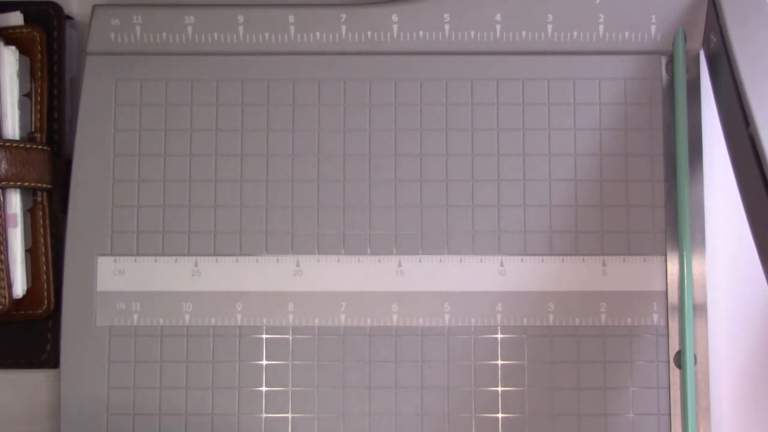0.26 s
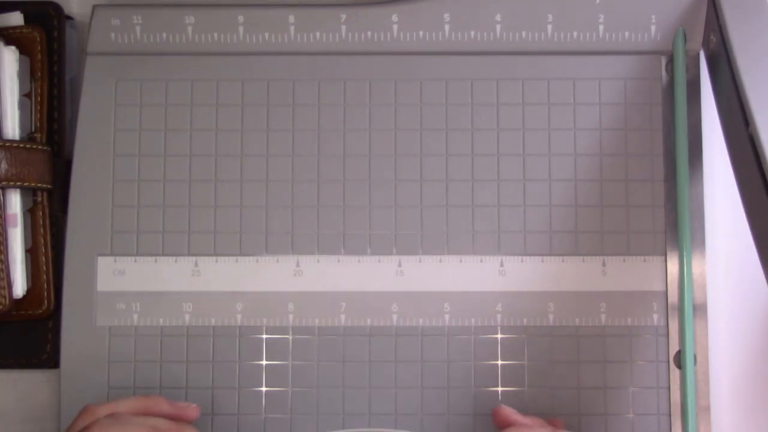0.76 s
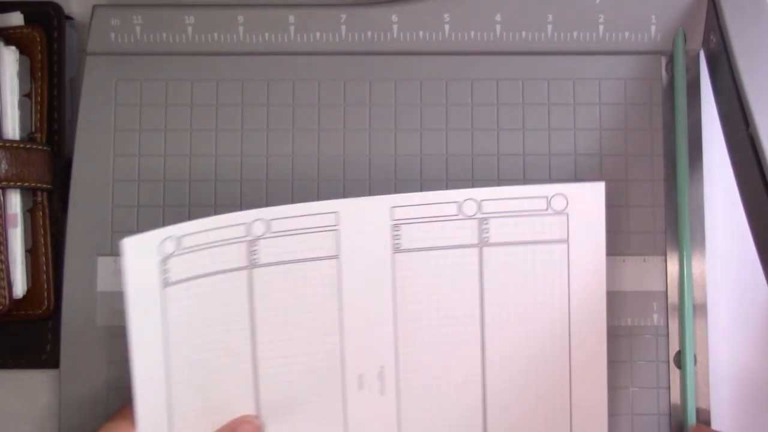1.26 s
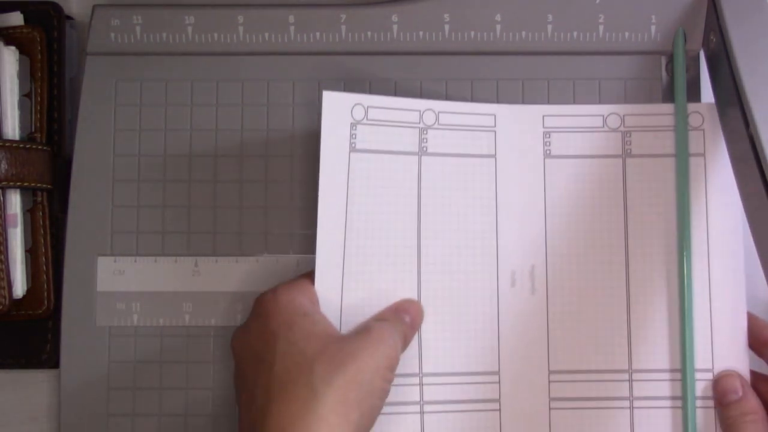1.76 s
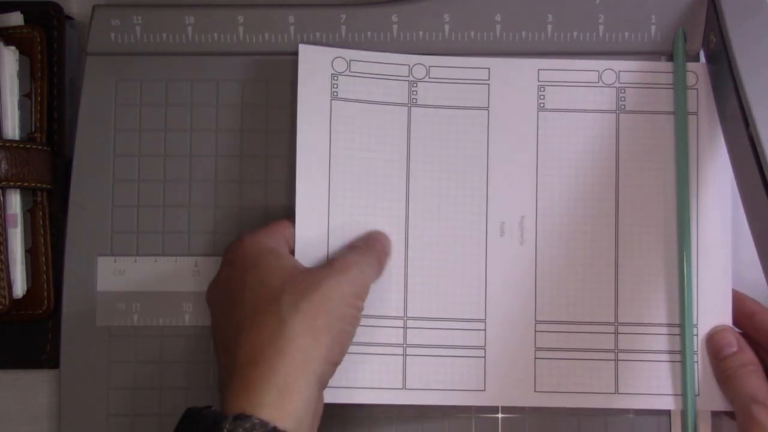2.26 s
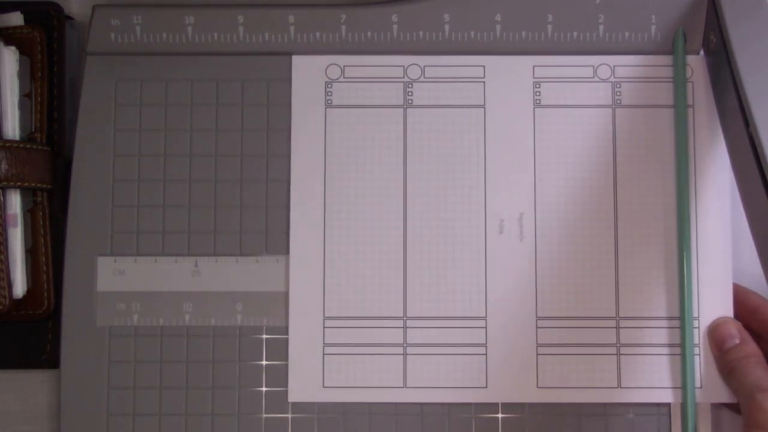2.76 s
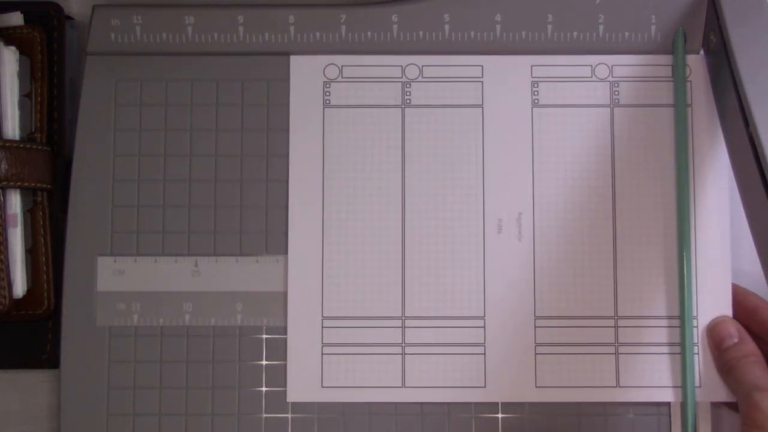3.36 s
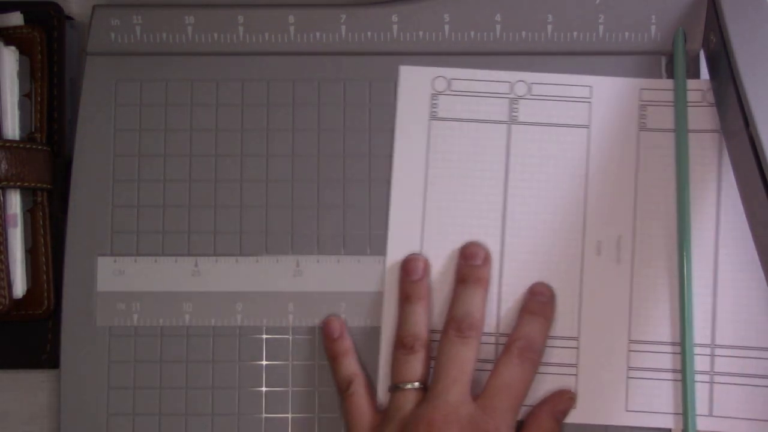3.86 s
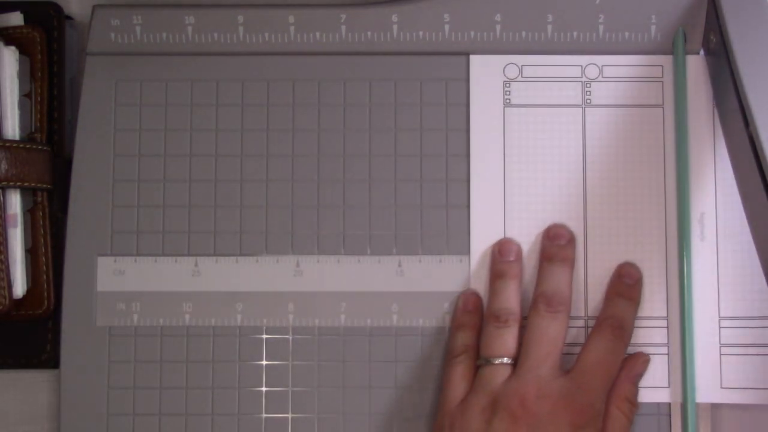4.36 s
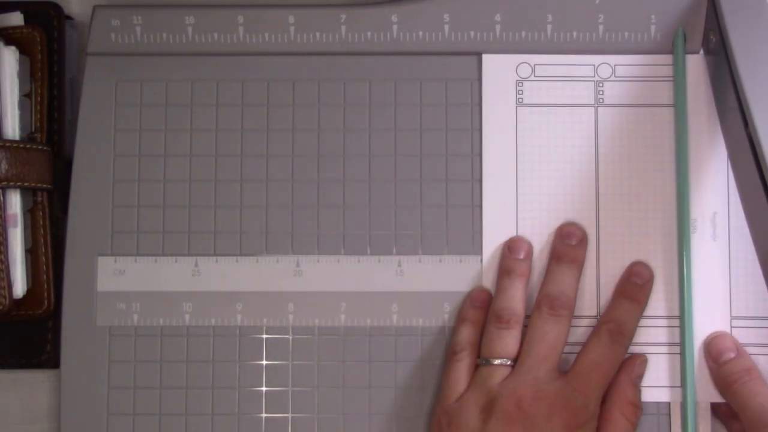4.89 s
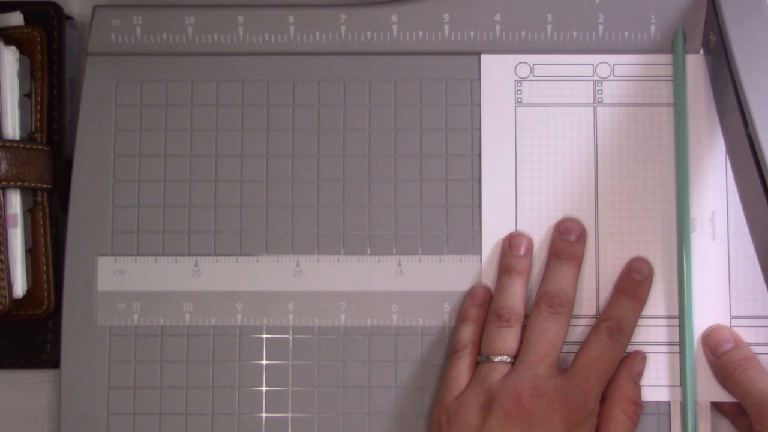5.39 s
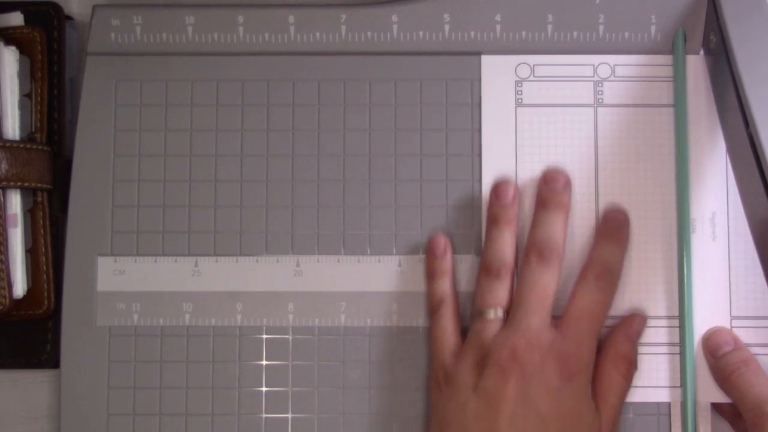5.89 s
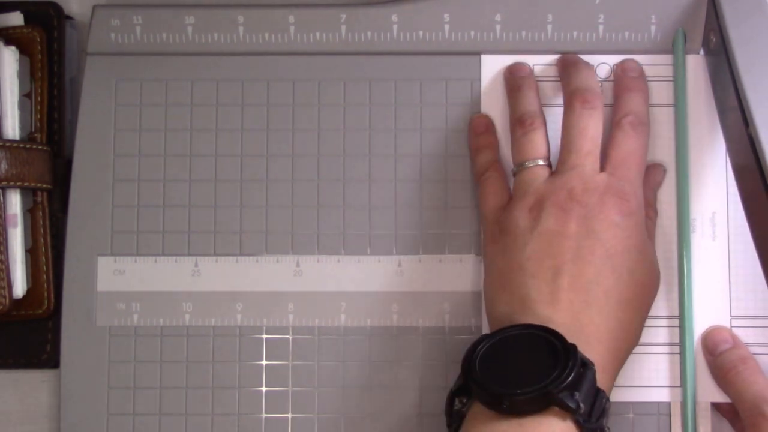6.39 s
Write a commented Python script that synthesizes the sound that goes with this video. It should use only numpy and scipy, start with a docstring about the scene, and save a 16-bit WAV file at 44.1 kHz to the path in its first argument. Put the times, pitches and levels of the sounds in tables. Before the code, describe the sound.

Close up in a quiet indoor room, a stack of paper slides and ticks lightly, then is knocked hard on a trimmer's bed, loud enough to distort the microphone. Softer slides and taps follow as the sheets are laid down. After a near-silent pause, the stack is pushed sideways with a brighter swish, small knocks and edge rasps, then faint hand brushes and low desk bumps.

```python
"""Paper slides and taps lightly, then a hard knock squares the stack; more slides and softer knocks follow.
The stack is laid on a guillotine trimmer and slid under the raised blade, close by in a quiet room.
Knocks ring the trimmer's bed. The sheets are crackling noise: they hiss as they slide, snap, swish and slap.
Where their edges catch, runs of pulses rasp on the bed. Bed and desk boom softly under pushes and the hard knock.
The hardest knock overloads the microphone, which clips it."""
import sys
import numpy as np
from scipy import signal
from scipy.fft import rfft, irfft
from scipy.io import wavfile
from scipy.ndimage import uniform_filter1d

SR = 44100
rng = np.random.default_rng(int(sys.argv[2]) if len(sys.argv) > 2 else 0)


def inscribe(sig):
    """Save sig as 16-bit PCM at rate SR to the path in sys.argv[1].

    A 1-D sig is mono; a 2-D sig holds one channel per row.
    Samples are clipped to [-1, 1] before scaling.
    """
    pcm = np.round(np.clip(np.atleast_2d(sig).T, -1, 1) * 32767)
    wavfile.write(sys.argv[1], SR, pcm.astype(np.int16))


N = 292824
TIME = np.arange(N) / SR  # seconds


def undb(db):
    """Turn decibels into a gain."""
    return 10 ** (np.asarray(db) / 20)


def unit(x):
    """Scale to an average (rms) strength of 1."""
    return x / np.sqrt(np.mean(x ** 2) + 1e-18)


def burst(x, db):
    """Scale a short sound so that its energy, spread over 10 ms, has this level."""
    return x * undb(db) / np.sqrt(np.sum(x ** 2) / (SR / 100) + 1e-18)


def add(out, s, x):
    """Mix x into out from time s on."""
    i = max(int(s * SR), 0)
    out[i:i + len(x)] += x[:max(N - i, 0)]


def cut(x, hz, kind, order=2):
    """Keep only what lies below hz ("low") or above it ("high")."""
    sos = signal.butter(order, min(hz, SR / 2 - 1000), kind, fs=SR, output="sos")
    return signal.sosfilt(sos, x)


def resonate(x, hz, width_hz):
    """Pass x through one resonance, with gain 1 at its centre."""
    return signal.lfilter(*signal.iirpeak(hz, hz / width_hz, fs=SR), x)


def through(x, resonances, body):
    """Mix a set of resonances (Hz, width, dB) with a share of the plain sound."""
    ringing = sum(undb(db) * resonate(x, hz, width) for hz, width, db in resonances)
    return unit(ringing) + body * unit(x)


def colour(x, points):
    """Shape the spectrum of x by (Hz, dB) points, at rms 1."""
    hz, db = np.transpose(points)
    bins = np.maximum(np.fft.rfftfreq(len(x), 1 / SR), 1)
    gain = undb(np.interp(np.log(bins), np.log(hz), db))
    return unit(irfft(rfft(x) * gain, len(x)))


def walk(rate):
    """Wander smoothly at random, with about `rate` new targets a second and spread near 1."""
    k = int(SR / rate)
    steps = np.repeat(rng.standard_normal(N // k + 1), k)
    return unit(uniform_filter1d(uniform_filter1d(steps, k), k)[:N])


def crackle(n, grain_db):
    """Paper fibres letting go: dense clicks, a few much larger than the rest."""
    sizes = np.minimum(rng.exponential(size=n), 5)
    return rng.standard_normal(n) * undb(grain_db * sizes)


# Ways the trimmer's bed rings when left free: (pitch [Hz], relative level [dB], time to fade by 60 dB [s])
BED_MODES = [(137, -19, 0.39), (194, -30.5, 0.21), (249, -28.5, 0.22), (294.8, -21.5, 0.61),
             (390, -13.5, 0.37), (449.5, 4.5, 0.23), (501, 1, 0.19), (725, -0.5, 0.18), (766, -5.5, 0.26),
             (1094, -6.5, 0.09), (1168.6, -10.5, 0.13), (1284.6, -5.5, 0.107), (1349, -12, 0.2),
             (1426, -8, 0.16), (1483, -11, 0.17), (1635.6, -6, 0.094), (1817, -9.5, 0.11),
             (1907, -12.5, 0.04), (2090, -6, 0.071), (2427, -12, 0.11), (2340, -8.5, 0.064),
             (2700, -13, 0.22), (2570, -14.5, 0.084), (3640, -15, 0.059), (3752, -13, 0.063),
             (3650, -14.5, 0.057), (3670, -12, 0.068), (4579, -12, 0.07), (4540, -15, 0.067),
             (4902, -12.5, 0.063)]
# Tone of the dense clatter and room tail in a tap: (frequency [Hz], relative level [dB per Hz])
CLATTER_TONE = [(100, -14.5), (200, -18.5), (300, -10), (450, 4.5), (750, 6.5), (1300, -4.5), (2200, 0.5),
                (3100, -5.5), (3900, -13.5), (4700, -8.5), (6000, -22), (16000, -21)]


def bed_response(clatter_db=-7, clatter_t60=0.075, room_db=-25, room_t60=0.53):
    """One tap on the bed: fading tones, a dense quick clatter and a short room tail."""
    t = TIME[:SR // 2]

    def fade(t60):
        """Die away by 60 dB in t60 seconds."""
        return np.exp(-np.log(1000) * t / t60)

    modes = np.zeros(len(t))
    for k, (hz, db, t60) in enumerate(BED_MODES):
        modes += (-1) ** k * undb(db) * fade(t60) * np.sin(2 * np.pi * hz * t)
    clatter = colour(rng.standard_normal(len(t)), CLATTER_TONE) * fade(clatter_t60)
    room = colour(rng.standard_normal(len(t)), CLATTER_TONE) * fade(room_t60)
    return burst(modes, 0) + burst(clatter, clatter_db) + burst(room, room_db)


def damped(ring_s, thud_hz=370, thud_s=0.0037, thud_db=-5):
    """A tap with a hand or the stack on the bed: the shorter the ring left, the more soft thud is added."""
    response = bed_response()
    t = TIME[:len(response)]
    thud = burst(np.sin(2 * np.pi * thud_hz * t) * np.exp(-t / thud_s), thud_db)
    return response * np.exp(-t / ring_s) + thud * np.exp(-ring_s / 0.023)


# Near echoes off the bed, the guide and the blade arm: (average delay [s], gain [times])
NEAR_ECHOES = [(.0009, 0.019), (.0023, -0.29), (.0037, .35), (.0058, .25)]


def near_echoes(x, drift=0.038):
    """Hard surfaces add echoes that comb the paper's sound; the comb shifts as the sheets move."""
    out = x
    for delay, gain in NEAR_ECHOES:
        lag = np.round(SR * delay * (1 + drift * walk(3))).astype(int)
        out = out + gain * x[np.clip(np.arange(N) - lag, 0, N - 1)]
    return out / np.sqrt(1 + sum(gain ** 2 for _, gain in NEAR_ECHOES))


SAG_DB_PER_S = 4.5  # a push slackens as it goes on


def stroke(start, length, rise, coast, ease=1.4):
    """Speed of the sheets in one push: they gather way, slacken slowly and coast to rest."""
    t = np.maximum(TIME - start, 0)
    gather = np.sin(np.pi / 2 * np.minimum(t / rise, 1)) ** ease
    return gather * undb(-SAG_DB_PER_S * t) * np.exp(-np.maximum(t - length, 0) / coast)


# Tone of the room's air: (frequency [Hz], relative level [dB per Hz])
ROOM_TONE = [(12, -21.5), (20, 0.5), (33, -15), (120, -8), (195, -15), (229, -13.5), (255, -19),
             (608, -22.5), (1130, -35), (1660, -39), (13000, -47.5)]
ROOM_DB = -66


def room_air():
    """The still air of the room: steady noise with the room's tone."""
    return undb(ROOM_DB) * colour(rng.standard_normal(N), ROOM_TONE)


# Hands leaning on the trimmer: (middle time [s], length [s], sway of the desk at its height [dB])
HAND_LEANS = [(0.11, 0.22, -47), (0.695, 0.42, -47), (1.05, 0.7, -64.5), (1.649, 0.42, -66),
              (2.4, 0.41, -67), (4.03, 0.3, -68), (4.695, 0.58, -62.5), (5.06, 0.38, -65.5),
              (5.503, 0.43, -51.5), (6.057, 0.61, -50.5), (6.588, 0.41, -60.5)]
REST_DB = -76  # sway of the desk with no weight on it
# Dull thumps of bed and desk, under pushes and under the hard knock:
# (time [s], pitch [Hz], level before the swell and fade [dB])
LOW_THUMPS = [(0.081, 120, -37.5), (0.571, 145.7, -25), (0.572, 92, -37), (4.385, 143.7, -36.5),
              (4.435, 138.2, -38.5), (5.388, 148.3, -40.5), (5.428, 144.5, -34.5), (5.469, 142.5, -36.5),
              (5.968, 136.3, -41), (2.299, 147.8, -48.5), (6.16, 142.4, -53), (6.485, 143, -48),
              (6.57, 145, -45.5)]


def low_booms(boom_hz=145, boom_t60=0.27, push_s=0.006, boom_db=-10):
    """Leaning hands rock the desk and stir the bed's lowest boom; pushes and the hard knock add dull thumps."""
    sway = undb(REST_DB)
    for s, length, db in HAND_LEANS:
        sway = sway + undb(db) * np.cos(np.pi * np.clip((TIME - s) / length, -.5, .5))
    weight = rng.standard_normal(N)
    desk = resonate(weight, 40, 9) + .5 * resonate(weight, 66, 4.7)
    desk = unit(cut(desk, 100, "low"))
    bed = unit(cut(resonate(weight, boom_hz, 22), 190, "low", order=4))
    out = sway * (desk + undb(boom_db) * bed)
    t = TIME[:SR // 2]
    swell = np.exp(-np.log(1000) * t / boom_t60) * (1 - np.exp(-t / push_s))
    for s, hz, db in LOW_THUMPS:
        add(out, s, undb(db) * np.sqrt(2) * swell * np.sin(2 * np.pi * hz * t))
    return out


# Light brushes over the paper, of a sheet's edge and last of the palm:
# (start time [s], length [s], rise [s], level before the push's shape [dB], starting centre [Hz],
#  glide in the first half second [Hz per s], width [Hz])
LIGHT_BRUSHES = [(3.926, 0.27, .06, -54.5, 4850, -1, 450), (4.252, 0.1, .07, -55, 6980, 598, 700),
                 (6.03, 0.29, 0.27, -59, 2750, 1100, 750)]
BRUSH_COAST_S = 0.031


def brushes():
    """A light contact hisses in one band, whose centre may glide: slow crackle shifted up in pitch."""
    out = np.zeros(N)
    for start, length, rise, db, centre_hz, glide, width_hz in LIGHT_BRUSHES:
        hz = centre_hz + glide * np.clip(TIME - start, 0, .5)
        carrier = np.cos(2 * np.pi * np.cumsum(hz) / SR)
        band = unit(cut(crackle(N, grain_db=4), width_hz / 2, "low") * carrier)
        out += undb(db) * stroke(start, length, rise, BRUSH_COAST_S) * band
    return out


# Resonances of a sheet dragged under the fingers: (pitch [Hz], width [Hz], relative level [dB])
EDGE_RESONANCES = [(1380, 55, -9), (2420, 48, -11), (3060, 55, 3), (4370, 82, -6), (5500, 70, -10),
                   (6310, 110, -17)]
# Fingers dragging over a sheet:
# (middle time [s], length [s], level before the swell [dB], top edge [Hz], share of plain scrape [times])
FINGER_DRAGS = [(3.421, 0.22, -71, 6460, 1.9), (3.518, .25, -55.5, 6680, .35),
                (3.632, 0.22, -53, 5980, 1.3), (3.78, 0.36, -57.5, 4880, 0.15),
                (4.902, .2, -57, 2560, 2.15), (5.71, 0.076, -63, 2588, 2.94)]


def drags():
    """A sheet creeping under the fingers sings faintly in a few narrow resonances."""
    out, t = np.zeros(N), TIME[:SR // 2]
    for s, length, db, top_hz, scrape in FINGER_DRAGS:
        friction = cut(crackle(len(t), grain_db=4.5), 1220, "high", order=4)
        song = through(friction, EDGE_RESONANCES, scrape)
        swell = np.sin(np.pi * np.minimum(t / length, 1))
        add(out, s - length / 2, undb(db) * swell * unit(cut(song, top_hz, "low", order=4)))
    return out


# Sheets snapping, swishing, and slapping together in the hard knock:
# (time [s], level before longer sounds are raised [dB], rise [s], decay [s], low edge [Hz], high edge [Hz])
SNAPS_AND_SWISHES = [(.0815, -52, 0.00045, 0.0024, 1500, 12000), (0.399, -43.5, 0.025, 0.028, 1490, 8600),
                     (0.569, -15, 0.0012, 0.0038, 1690, 4400), (0.582, -30.5, 0.013, 0.015, 6093, 16000),
                     (0.9, -46.5, 0.0036, 0.0041, 2000, 10200), (0.995, -51.5, 0.00036, 0.0014, 1980, 8400),
                     (1.051, -48.5, 0.00085, 0.0064, 880, 5700), (1.108, -53, 0.00056, 0.0034, 3000, 9800),
                     (1.127, -49, .0005, 0.0025, 2960, 9900), (1.158, -54, 0.0012, 0.0056, 4000, 10000),
                     (1.653, -46, 0.0077, 0.027, 3000, 7040), (2.041, -36, .0008, 0.0028, 1780, 3800),
                     (2.0623, -38, 0.0016, 0.004, 1805, 2200), (2.3, -41, 0.02, 0.01, 1780, 13100),
                     (2.325, -41, 0.0037, 0.0088, 1771, 12600), (3.8025, -44, .0004, .0015, 900, 8000),
                     (3.957, -42, .008, .008, 2487, 6003), (4.352, -44.5, 0.037, 0.023, 3150, 13000),
                     (4.579, -45, 0.046, 0.015, 2520, 10700), (5.485, -41, 0.011, .008, 1500, 14900),
                     (5.4912, -31, 0.0028, 0.0058, 1890, 5800), (5.707, -58.5, 0.00059, 0.0033, 1390, 5090),
                     (5.7271, -50, 0.0011, 0.0084, 2520, 4970), (5.826, -55, 0.0026, 0.023, 2024, 11200),
                     (5.947, -49.5, 0.0033, 0.045, 4020, 13200), (6.503, -66, 0.00065, 0.0038, 1164, 7900),
                     (6.533, -63, 0.00044, 0.0035, 1200, 8060)]


def snaps_and_swishes(tail_db=-24, tail_s=0.05):
    """A crackle swells and dies, quickly in a snap or slap and slowly in a swish; the room holds it a moment."""
    out, t = np.zeros(N), TIME[:SR // 3] - .1  # the swell starts before the peak
    after = np.maximum(t, 0)
    for s, db, rise, decay, low_hz, high_hz in SNAPS_AND_SWISHES:
        swell = np.exp(-(np.minimum(t, 0) / rise) ** 2)
        fade = np.exp(-after / decay) + undb(tail_db) * np.exp(-after / tail_s)
        sound = cut(crackle(len(t), grain_db=3.5) * swell * fade, low_hz, "high", order=3)
        sound = cut(sound, high_hz, "low", order=3)
        add(out, s + t[0], burst(sound, db) * np.sqrt(1 + (rise + decay) / 0.064))
    return out


# Edges catching and slipping: (middle time [s], length [s], level before scaling by length [dB],
#  approximate slip rate [per s], low edge [Hz], high edge [Hz])
EDGE_RASPS = [(0.088, 0.022, -37.5, 350, 815, 1520), (0.099, 0.024, -23.5, 596, 1600, 1900),
              (0.13, 0.038, -40.5, 380, 595, 2270), (0.163, 0.012, -36.5, 380, 1190, 1850),
              (0.334, 0.012, -39, 328, 830, 1660), (0.533, .034, -45, 234, 912, 1340),
              (1.133, 0.07, -50, 260, 820, 1166), (1.213, 0.028, -48.5, 320, 1295, 1690),
              (1.295, 0.056, -43.5, 250, 810, 1790), (0.926, 0.15, -43.5, 218, 301, 750),
              (1.526, 0.16, -48, 250, 380, 850), (2.088, 0.062, -58, 250, 304, 688),
              (2.307, 0.082, -38.5, 249, 246, 2400), (2.338, .13, -48.5, 240, 280, 650),
              (1.321, 0.043, -53, 262, 200.5, 380), (3.635, 0.078, -57.5, 296, 380, 650),
              (4.322, 0.076, -57.5, 280, 900, 1200), (4.403, 0.041, -32, 282, 870, 2780),
              (4.443, .018, -31.5, 258, 650, 2670), (4.583, 0.062, -51, 370, 1280, 5200),
              (5.316, 0.0096, -35, 280, 201, 622), (5.342, 0.036, -37.5, 267, 203, 560),
              (5.381, 0.047, -36, 176, 201, 609), (5.413, 0.055, -36.5, 173, 200, 546),
              (5.102, .02, -67.5, 430, 700, 2960), (5.692, 0.0082, -55, 470, 1200, 2020),
              (6.324, 0.27, -66.5, 200, 300, 749), (6.5, 0.025, -53.5, 214, 350, 2010),
              (6.545, 0.055, -46, 140, 300, 1895)]


def rasps(jitter=0.29, scatter_db=3, grit=0.25, ring_s=0.01):
    """Stick and slip: a short run of uneven pulses drives the bed."""
    out, t = np.zeros(N), TIME[:SR // 4]
    for s, length, db, rate, low_hz, high_hz in EDGE_RASPS:
        gap, size = rng.standard_normal((200, 2)).T
        slips = np.cumsum(np.exp(jitter * gap)) / rate  # times of the slips
        force = np.histogram(slips, len(t), (0, t[-1]), weights=undb(scatter_db * size))[0]
        force = unit(force) + grit * rng.standard_normal(len(t))
        force *= np.sin(np.pi * np.minimum(t / length, 1))
        sound = cut(signal.fftconvolve(force, damped(ring_s)), low_hz, "high")
        sound = cut(sound, high_hz, "low", order=4)
        add(out, s - length / 2, burst(sound, db) * np.sqrt(length / 0.018))
    return out


def crinkle(rate=160, size_db=2, grain_s=.0015):
    """Gain of a sliding contact: fibres or edges catch for a moment, about `rate` times a second."""
    catches = (rng.random(N) < rate / SR) * undb(size_db * np.minimum(rng.exponential(size=N), 2))
    return unit(1 + .5 * signal.lfilter([1], [1, -np.exp(-1 / (grain_s * SR))], catches))


# Resonances of the loose stack: (pitch [Hz], width [Hz], relative level [dB])
STACK_RESONANCES = [(1020, 42, -8), (1590, 380, 4), (1880, 220, -1), (2670, 36, -2), (2790, 59, -4.5),
                    (4874, 850, -5.5), (6720, 480, -2), (8000, 450, -4)]
# Tone given to the hiss of the sheets' faces: (frequency [Hz], relative level [dB per Hz])
HISS_TONE = [(900, -30.5), (2000, -10.5), (4000, -8.5), (5500, -3.5), (7500, 1), (10000, -2), (13000, -4),
             (16000, -9.5)]
# Tone given to the stack's rustle: (frequency [Hz], relative level [dB per Hz])
RUSTLE_TONE = [(900, -27), (1500, -10.5), (1900, -5), (2400, -2), (3300, 2.5), (4900, 0), (6000, -9),
               (9000, -22)]
# Tone given to the sheets' rub on the bed: (frequency [Hz], relative level [dB per Hz])
RUB_TONE = [(500, -22), (800, -2.5), (1100, 1.5), (1700, 1), (2200, -7.5), (3000, -10.5), (6000, -41)]
# Pushes of the sheets over the bed: (start time [s], length [s], rise [s], coast [s],
#  then relative levels: rustle [dB], hiss of the faces [dB], rub on the bed [dB])
SHEET_STROKES = [(0.0, 0.095, 0.0014, 0.15, -58, -58.5, -66), (0.092, 0.17, 0.14, 0.044, -49.5, -48, -57),
                 (0.294, 0.095, 0.028, 0.083, -49.5, -53.5, -57.5),
                 (0.455, 0.15, 0.034, .02, -56, -56, -56.5),
                 (0.564, 0.31, 0.027, 0.0099, -50, -50.5, -47.5),
                 (0.905, 0.18, 0.021, 0.032, -59, -64.5, -55), (1.037, 0.16, 0.035, 0.023, -54.5, -56, -58),
                 (1.232, 0.046, .01, .02, -69, -77.5, -66), (1.273, 0.13, 0.0093, 0.025, -57, -56, -57.5),
                 (1.382, 0.22, 0.066, 0.063, -55, -49.5, -54.5),
                 (1.619, 0.095, 0.031, 0.1, -54.5, -49.5, -76.5),
                 (1.769, 0.028, .012, 0.017, -52.5, -68, -68),
                 (1.835, 0.095, 0.062, 0.067, -51.5, -52, -77),
                 (2.033, 0.066, 0.029, 0.047, -56, -57.5, -64), (2.163, 0.083, 0.044, .03, -51, -59, -61),
                 (2.222, 0.081, .055, 0.039, -48, -46.5, -51.5),
                 (2.414, .05, 0.017, 0.022, -74.5, -66, -86), (2.55, 0.15, .04, .1, -83, -88, -83.5),
                 (3.601, .085, 0.076, 0.047, -52, -47.5, -59.5),
                 (3.684, .12, 0.075, 0.047, -55.5, -49, -64), (3.764, 0.34, 0.072, 0.21, -47, -46, -45.5),
                 (4.255, 0.11, 0.04, .02, -51, -54, -56.5),
                 (4.389, 0.085, 0.026, 0.024, -58.5, -57.5, -47.5),
                 (4.496, 0.081, 0.096, 0.044, -47.5, -55, -40),
                 (4.817, 0.14, 0.057, 0.017, -60, -68, -69.5), (5.007, 0.016, .005, 0.034, -66.5, -79, -60),
                 (5.301, 0.017, 0.0063, .006, -71, -67, -58), (5.329, 0.027, .008, .006, -63, -62, -54.5),
                 (5.362, 0.059, 0.013, 0.021, -57.5, -58, -49), (5.476, 0.021, 0.011, 0.024, -63, -83, -42),
                 (5.678, 0.065, 0.018, 0.028, -66.5, -65, -61.5),
                 (5.721, 0.099, .07, 0.019, -62, -53.5, -62),
                 (5.807, 0.046, .015, 0.024, -61, -51.5, -47.5), (5.928, 0.094, .02, 0.21, -61.5, -50, -65),
                 (6.192, 0.24, 0.049, 0.021, -66.5, -64, -74),
                 (6.395, 0.048, 0.019, 0.028, -72.5, -69.5, -65),
                 (6.464, 0.14, .05, 0.063, -66.5, -63, -58)]
HISS_DB, RUB_DB, RING_DB = -2, -3, -4  # balance of the hiss, the rub and the bed's ring


def sliding(flutter_db=0.88):
    """Sheets hiss and rustle through the stack's resonances; their friction rubs and rings the bed."""
    hiss, rustle, rub = np.zeros((3, N))
    for start, length, rise, coast, rustle_db, hiss_db, rub_db in SHEET_STROKES:
        speed = stroke(start, length, rise, coast)
        hiss = np.maximum(hiss, undb(hiss_db) * speed)
        rustle = np.maximum(rustle, undb(rustle_db) * speed)
        rub = np.maximum(rub, undb(rub_db) * speed)

    faces = colour(through(crackle(N, grain_db=2.5), STACK_RESONANCES, body=3), HISS_TONE)
    stack = colour(through(crackle(N, grain_db=3.5), STACK_RESONANCES, body=1.8), RUSTLE_TONE)
    in_air = undb(HISS_DB) * hiss * faces * undb(flutter_db * walk(50))
    in_air += rustle * stack * undb(flutter_db * walk(50))

    driven = signal.fftconvolve(crackle(N, grain_db=4.5), damped(0.11))[:N]
    rubbing = colour(unit(driven) + unit(crackle(N, grain_db=5.0)), RUB_TONE)
    short_tap = damped(.016, thud_hz=450, thud_db=-8)
    ringing = signal.fftconvolve(crackle(N, grain_db=3), short_tap)[:N]
    ringing = unit(cut(ringing, 800, "low", order=4))
    in_bed = rub * (undb(RUB_DB) * rubbing + undb(RING_DB) * ringing) * undb(flutter_db * walk(50))
    return (near_echoes(in_air) + in_bed) * crinkle()


# Knocks on the bed: (time [s], level [dB], contact brightness [Hz], time over which the sheets land [s],
#  ring left by the hand [s])
BED_KNOCKS = [(0.081, -36.5, 700, 0.0034, 0.003), (0.157, -44, 3000, .003, 0.0026),
              (0.332, -50, 2500, .004, 0.0038), (0.565, -14, 2530, 0.0041, 0.017),
              (.5686, 1, 3530, 0.0051, .05), (.587, -11, 497, 0.007, 0.035),
              (.622, -25.5, 2000, 0.0073, 0.023), (.632, -29, 900, 0.011, 0.021),
              (0.897, -35, 1500, 0.0068, 0.0099), (0.9014, -27.5, 593, 0.0011, 0.039),
              (0.956, -50, 692, 0.0035, .05), (1.2875, -44, 2440, 0.0034, 0.0086),
              (1.438, -43, 900, 0.012, 0.12), (1.5066, -33, 598.5, 0.0014, 0.038),
              (2.173, -51.5, 500.4, 0.0053, 0.05), (2.2935, -30.5, 1190, 0.0039, 0.024),
              (2.320, -36, 992.5, 0.0035, 0.026), (3.802, -37.5, 2000, 0.0017, 0.014),
              (4.1967, -41.5, 1290, 0.0079, 0.009), (4.2421, -28.5, 2590, 0.00059, 0.015),
              (4.382, -36.5, 900, 0.0017, 0.0047), (4.389, -28.5, 900, 0.0042, 0.0094),
              (4.441, -32.5, 790, 0.0052, 0.0092), (4.612, -45.5, 1500, 0.0027, 0.0028),
              (4.638, -45.5, 2440, 0.0019, .012), (5.014, -52, 2497, 0.0028, 0.0096),
              (5.476, -35, 2500, 0.0036, 0.0094), (5.822, -39, 1714, .003, 0.023),
              (5.946, -44.5, 2034, 0.0036, 0.033), (6.1199, -37, 1480, 0.014, 0.06),
              (6.572, -45, 696, .002, 0.011), (6.625, -48, 694, .007, 0.02)]


def knocks(straggle=0.79):
    """The stack lands with one blow, then its single sheets follow; a softer contact is duller."""
    out, t = np.zeros(N), TIME[:SR // 10]
    for s, db, bright_hz, spread, ring_s in BED_KNOCKS:
        sheets = cut(rng.standard_normal(len(t)), 890, "high") * np.exp(-t / spread)
        force = straggle * sheets / np.linalg.norm(sheets)
        force[0] += 1  # the one blow
        force = cut(force, bright_hz, "low", order=1)
        add(out, s, burst(signal.fftconvolve(force, damped(ring_s)), db))
    return out


def scene():
    """Paper, trimmer and hands over the still air of the room."""
    paper_in_air = near_echoes(snaps_and_swishes() + brushes())
    mix = room_air() + low_booms() + paper_in_air + drags() + rasps() + sliding() + knocks()
    return mix[None]


TOP_HZ = 15900  # highest pitch the microphone passes


def record(dry):
    """The microphone clips at full scale, then a steep filter cuts the top."""
    clipped = np.clip(dry, -1, 1)
    return signal.sosfilt(signal.ellip(10, .1, 70, TOP_HZ, fs=SR, output="sos"), clipped)


dry = scene()
out = record(dry)
inscribe(out)
```